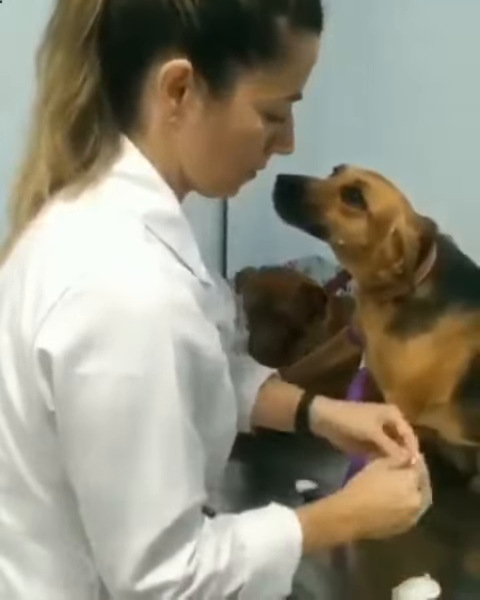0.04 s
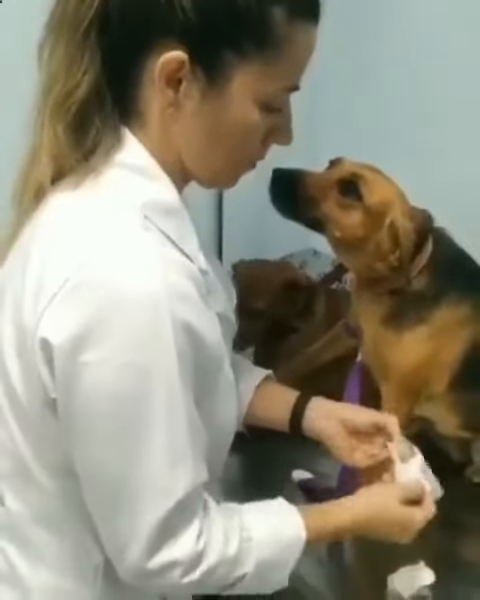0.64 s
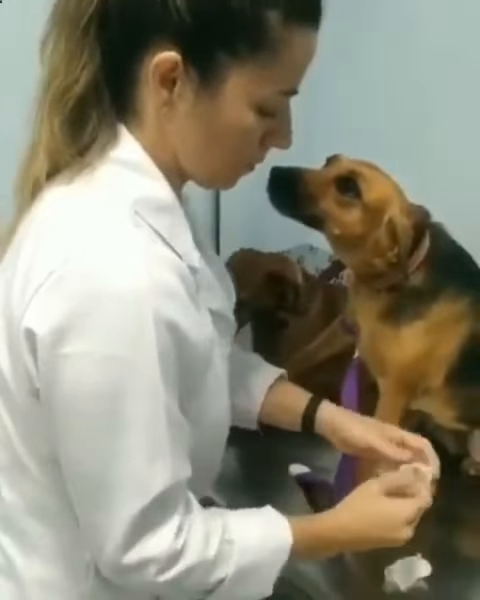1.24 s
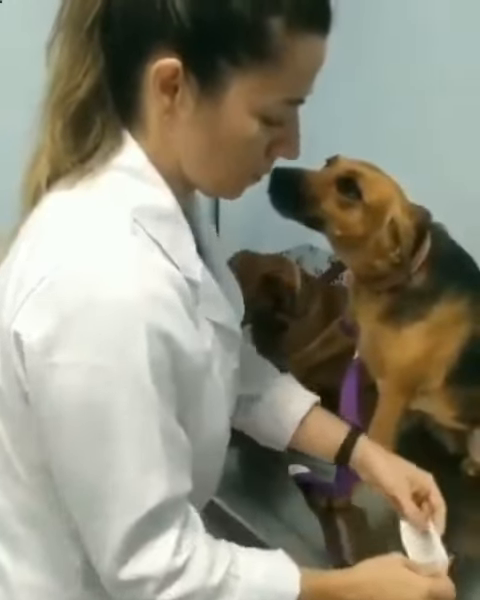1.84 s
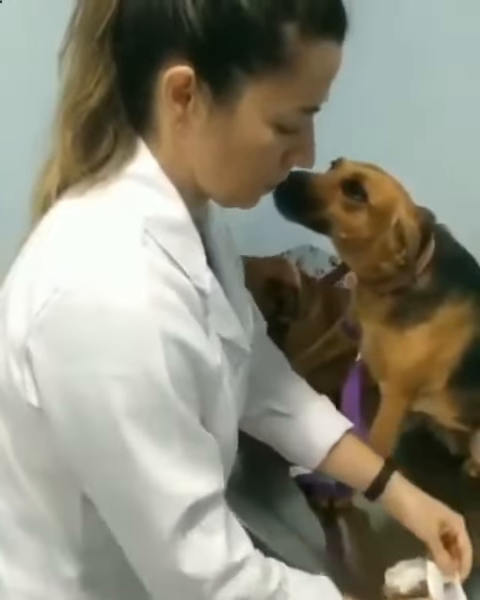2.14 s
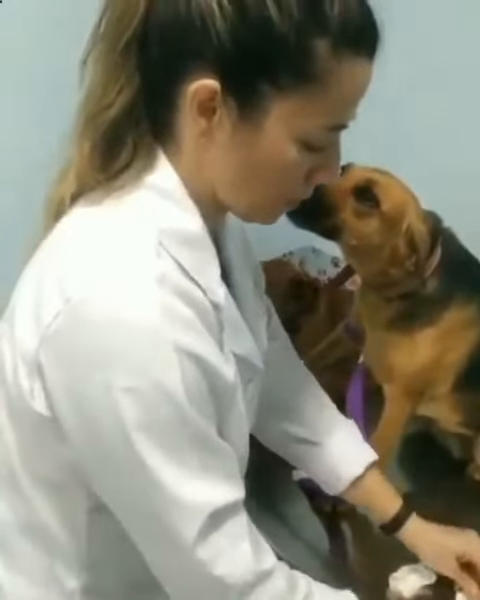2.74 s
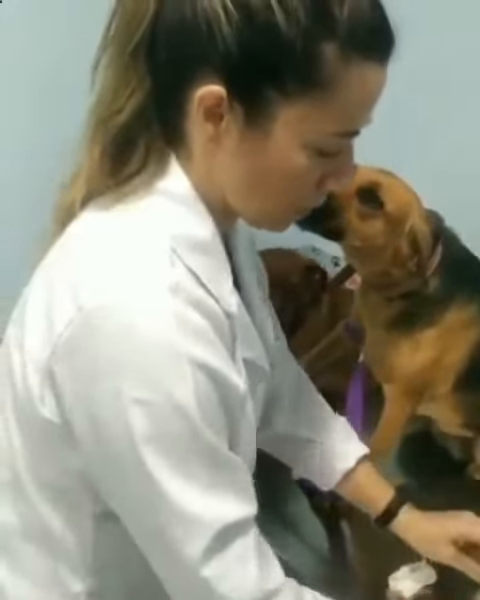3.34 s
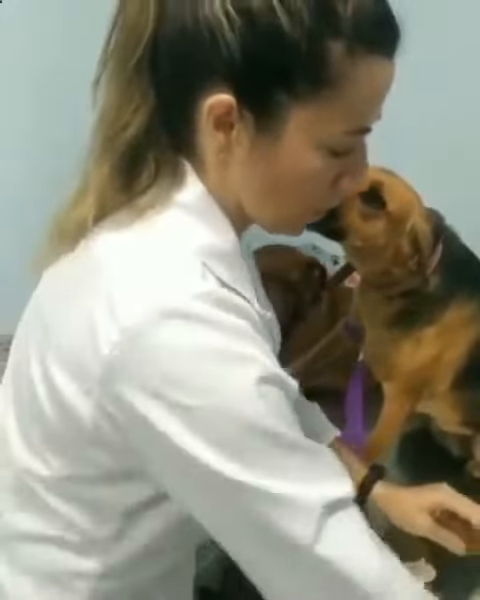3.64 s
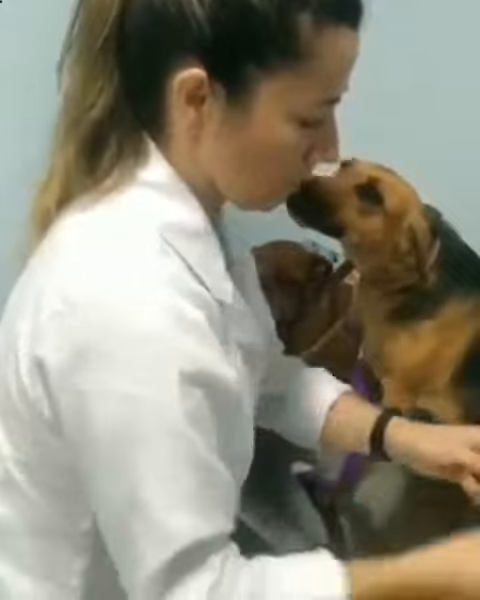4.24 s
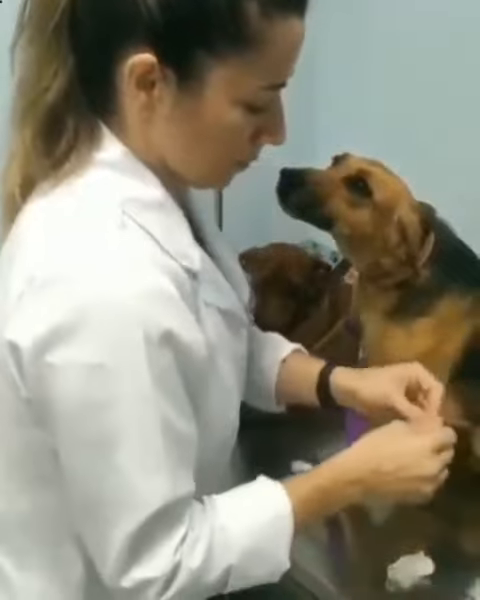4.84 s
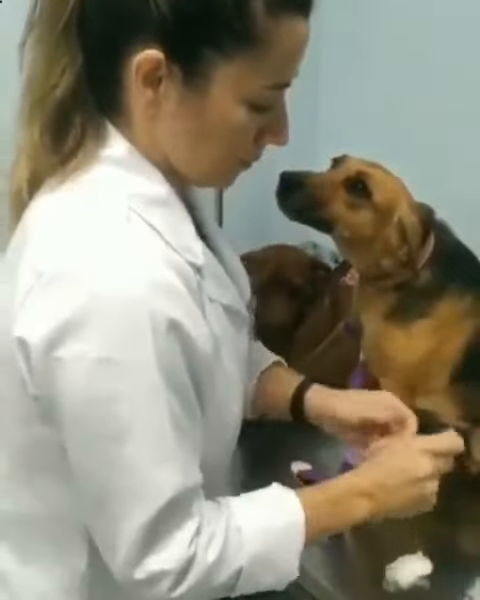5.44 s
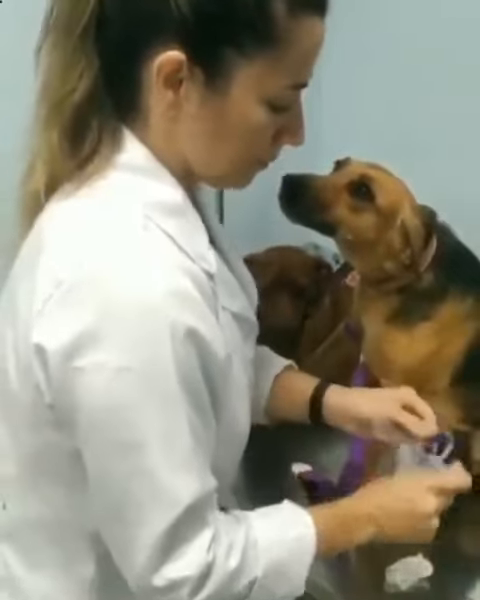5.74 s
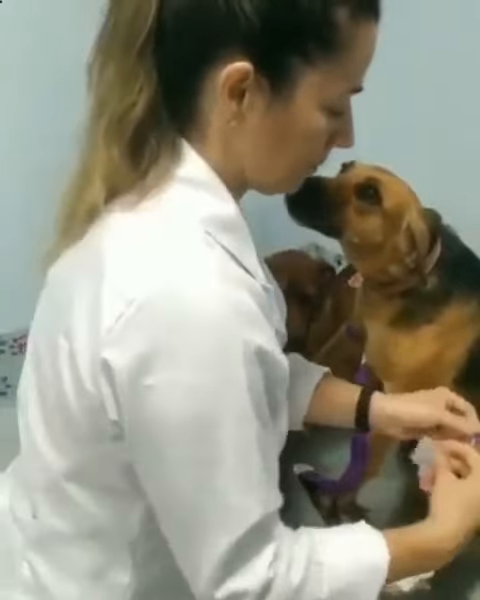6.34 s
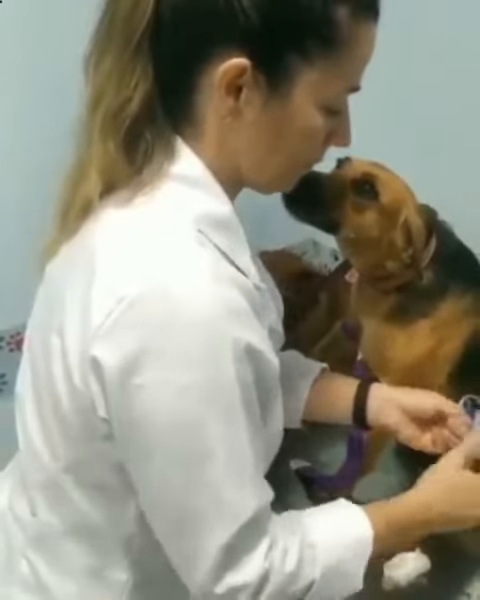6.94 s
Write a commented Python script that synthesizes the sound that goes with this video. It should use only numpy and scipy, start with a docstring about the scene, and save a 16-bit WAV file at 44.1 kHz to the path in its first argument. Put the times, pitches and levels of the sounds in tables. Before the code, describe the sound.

A paper packet crackles and tears in two busy spells with softer rustling between, in a small room with a low hum.

```python
"""Paper crackles softly over a faint fan hum as hands peel open a gauze wrapper in a small, hard room.
Creases buckle in dense crackles and single snaps, and the opening pouch rings hollow. A coat sleeve
brushes past, and fibres break in short rips that slide in pitch. The hands reach aside and the paper
quietens, then they tear and crinkle it again. The walls answer with a short, bright reverb."""
import sys
import numpy as np
from scipy import signal
from scipy.fft import rfft, irfft, next_fast_len
from scipy.io import wavfile
from scipy.ndimage import uniform_filter1d, map_coordinates

SR = 44100
rng = np.random.default_rng(int(sys.argv[2]) if len(sys.argv) > 2 else 0)


def transcribe(signal):
    """Save signal, clipped to [-1, 1], as a 16-bit WAV file at the path in sys.argv[1]."""
    frames = np.atleast_2d(signal).T
    limited = np.clip(frames, -1, 1)
    pcm = np.round(limited * 32767).astype(np.int16)
    wavfile.write(sys.argv[1], SR, pcm)


N = 313110

# Fan and duct tones. Each row: pitch in Hz, level in dB.
FAN_TONES = [(14.3, -48), (43.2, -69.5), (59.2, -58), (105.5, -65), (119.5, -63), (134.2, -65.5),
             (226.3, -71), (254, -72.5)]
# The fader ride on those tones. Each row: time in seconds, gain in dB.
FAN_RIDE = [(0, -0.5), (4.3, 0.5), (5.2, -3.5), (7.1, -4)]
# The colour of moving air. Each row: frequency in Hz, gain in dB.
AIR_EQ = [(10, -5), (30, 6.5), (48, 3.5), (80, -4), (125, 2), (160, -0.5), (320, -1), (550, -7), (900, -11),
          (1600, -16.5), (3200, -27), (6000, -31), (11000, -33)]
# Light fingering that keeps the paper crackling. Each row: time in seconds, crisp level in dB.
FINGERING = [(0, -63.5), (.4, -56.5), (.6, -48.5), (1.25, -49), (1.55, -59.5), (2.25, -58.5), (2.4, -51.5),
             (2.75, -45), (2.9, -56), (3.17, -52.5), (3.5, -59), (3.62, -70.5), (4.95, -70.5), (5.3, -42.5),
             (5.95, -48), (6.27, -68), (6.5, -53.5), (7.1, -61)]
# Pulls and squeezes; tight creases are brighter than broad peeling. Each row: start in seconds,
# length in seconds, crisp level in dB, then sheet body and top treble, both in dB relative to it.
PULLS = [(-0.016, 0.014, -41, -25, -5), (0.463, 0.21, -38.5, -5.5, -1.5), (0.591, 0.047, -29, -25, -8),
         (0.70, 0.084, -31.5, -8.5, -0.5), (0.788, 0.047, -30.5, -9, -3), (0.941, 0.075, -45, -6.5, 5.5),
         (1.087, 0.21, -47.5, -12, -7), (1.348, 0.069, -45, -5, 1), (1.579, 0.13, -48, -8.5, 0.5),
         (1.727, 0.066, -47.5, -5.5, 3), (1.818, 0.063, -39, -19, -3), (1.928, 0.089, -39, -8, -7.5),
         (2.101, 0.04, -42.5, -7.5, -3.5), (2.325, 0.056, -59, 0, 11), (2.54, 0.034, -48, 2.5, -5),
         (2.967, 0.062, -45, -3.5, 5.5), (3.03, 0.068, -41.5, -5, 0), (3.208, 0.03, -46, -7.5, 0),
         (3.947, 0.074, -52.5, -1, -4), (4.014, 0.044, -44.5, -7.5, -3.5), (4.093, 0.095, -58.5, -3, 3),
         (4.193, 0.048, -46, -8.5, -9), (4.34, 0.047, -51.5, -7.5, -9), (4.754, 0.038, -50, -3, -6),
         (4.968, 0.088, -60, 3, 1), (5.112, 0.078, -50.5, -2.5, -13), (5.24, 0.11, -38.5, -4.5, 7.5),
         (5.434, 0.039, -31, -5, 2), (5.473, 0.031, -33.5, -11, 5), (5.57, 0.028, -42.5, -16, 5.5),
         (5.989, 0.028, -42, -3.5, 0), (6.047, 0.041, -38, -11, -10), (6.319, 0.044, -45, -5.5, -6),
         (6.574, 0.054, -38, -14, -3.5), (6.861, 0.051, -47, -16, -4), (6.945, 0.076, -49, -3, 0)]
# The crisp colour of tiny creases. Each row: frequency in Hz, gain in dB.
CRISP_EQ = [(1500, -42), (3300, -19), (4500, -5.5), (5500, -1.5), (6500, 0), (7500, 2.5), (9200, 4),
            (11100, 2.5), (11800, -12)]
# The body of the bending sheet. Each row: frequency in Hz, gain in dB.
SHEET_EQ = [(120, -13), (300, -15), (650, -7), (1000, -3.5), (1400, 1.5), (2100, 1.5), (2700, 3),
            (3300, 0.5), (4000, 5.5), (5200, 0), (8000, -22.5)]
# The hollow resonances of the pouch. Each row: centre in Hz, width in Hz, gain in dB.
POUCH_MODES = [(336, 32, 3.5), (413, 33, -2.5), (1380, 250, -2.5)]
# How strongly the pouch joins the sheet. Each row: time in seconds, gain in dB.
POUCH_OPEN = [(0, 3), (.4, -2.5), (.55, -6), (.8, -18), (1.02, -1.5), (1.3, -5.5), (1.9, -20), (5.2, -22.5),
              (7.1, -11)]
# Creases that give way at once. Each row: start in seconds, crisp level in dB, flap level relative
# to it in dB, flap centre in Hz, decay time of the run of buckles in seconds.
SNAPS = [(0.117, -48, -10, 2440, 0.0044), (0.124, -43.5, -3, 3100, 0.03), (0.266, -54.5, 4, 3560, 0.0025),
         (0.279, -57, 7.5, 1370, 0.0053), (0.359, -42, -1, 3850, 0.01), (0.398, -55.5, 12, 1530, 0.0054),
         (0.443, -35.5, 1.5, 3540, 0.0091), (0.457, -35, 2.5, 4700, 0.0059),
         (0.605, -28.5, -2.5, 4840, 0.024), (0.623, -28.5, -4, 5060, 0.006), (0.713, -32, -3, 4950, 0.015),
         (0.759, -36, -10, 4000, 0.002), (0.791, -35, 1, 5500, 0.0025), (0.998, -40, -1, 1310, 0.0021),
         (1.106, -42, -6, 4220, 0.0027), (1.244, -48, -14, 4560, 0.0013), (1.265, -44.5, 2, 1290, 0.0044),
         (1.363, -51, -10, 5000, .012), (1.586, -48, -7, 4500, 0.003), (1.599, -44.5, 0, 2620, 0.0095),
         (1.813, -36, -5, 6340, 0.002), (1.856, -37, -12, 6000, 0.006), (1.929, -32, -3, 2940, 0.0032),
         (1.935, -42, -14, 3200, 0.0013), (1.991, -39, 1, 3980, 0.0012), (2.082, -41, -14, 5040, .0006),
         (2.117, -42, -2.5, 4050, 0.0011), (2.280, -46, -8, 3970, .0005), (2.326, -48, -14, 6030, 0.003),
         (2.341, -44, 5.5, 2360, 0.002), (2.475, -46, -14, 6500, .0007), (2.49, -48, -19, 4000, .001),
         (2.562, -37, -10, 3220, .003), (2.69, -37, -9, 3480, 0.019), (2.763, -35.5, -20, 4080, 0.005),
         (2.961, -40, -5.5, 2880, .005), (3.01, -39, -26, 4030, 0.0006), (3.049, -41, -4, 4500, .004),
         (3.085, -36, -17, 4500, 0.003), (3.154, -39.5, -25, 4500, 0.0034), (3.178, -40, -24, 4000, 0.0005),
         (3.968, -49, 1.5, 2660, 0.014), (4.199, -46, 2.5, 2050, 0.053), (4.36, -52, 2, 2440, 0.002),
         (4.757, -49.5, -1, 2840, 0.0018), (4.765, -57.5, 5, 3530, .001), (4.993, -58.5, 3, 2980, 0.002),
         (5.025, -42.5, -4, 4670, 0.0008), (5.15, -38, -3, 1950, 0.002), (5.226, -26, -4, 8850, 0.0003),
         (5.231, -28.5, -1, 8500, 0.001), (5.241, -34, -13, 7450, 0.0098), (5.286, -28.5, -9, 3000, 0.003),
         (5.294, -33, -0.5, 3400, 0.00053), (5.432, -29.5, -2, 4230, 0.004),
         (5.438, -28, -1.5, 4500, 0.0015), (5.456, -24, -10, 4800, 0.007), (5.478, -27, -2, 4500, 0.0013),
         (5.505, -30, 0, 8100, 0.005), (5.575, -34.5, -2, 2330, .015), (5.672, -26, -10, 3200, 0.018),
         (5.886, -56, 3, 4000, 0.0025), (5.964, -34.5, -3.5, 4700, 0.0022), (5.970, -38.5, 0, 4700, .0012),
         (6.039, -44, 2, 5000, 0.0027), (6.312, -47, 4.5, 4700, 0.00045), (6.355, -44, -3, 4020, 0.0025),
         (6.426, -39.5, 3, 3300, 0.0015), (6.439, -55, 8, 3500, .002), (6.551, -29.5, -4.5, 3270, 0.028),
         (6.555, -35, -7.5, 3960, 0.0011), (6.843, -58, -11, 5000, 0.00093), (6.924, -45, -4, 6500, 0.001),
         (6.958, -46.5, 3.5, 4530, 0.0013), (7.037, -36.5, -10.5, 3400, 0.018),
         (7.094, -33.5, -5.5, 4070, 0.011)]
# The colour of the flap a crease sets free. Each row: multiple of the flap's centre, gain in dB.
FLAP_EQ = [(.16, -24.5), (.45, -1), (.8, 4.5), (1.2, 8.5), (1.7, -2.5), (3.2, -7)]
# Soft brushes of cloth and fingers.
# Each row: peak time in seconds, half length in seconds, level in dB, centre in Hz.
BRUSHES = [(0.484, 0.053, -61, 352), (.75, 0.26, -61, 620), (1.002, 0.0069, -47, 460),
           (1.204, 0.92, -63.5, 780), (2.672, 0.15, -62, 895), (3.032, 0.23, -59.5, 706),
           (4.02, 0.065, -62, 850), (4.22, 0.051, -53.5, 785), (5.332, 0.037, -50, 425),
           (6.08, 0.085, -60, 447), (6.54, 0.16, -57, 440)]
# Rips whose pitch slides as the freed flap changes length.
# Each row: start in seconds, length in seconds, level in dB, first pitch in Hz, last pitch in Hz.
TEARS = [(0.456, 0.022, -31, 4800, 7300), (0.744, 0.096, -37, 8360, 4550), (1.814, 0.09, -48, 6800, 7500),
         (5.235, 0.06, -37.5, 8450, 3130), (5.452, 0.031, -38.5, 4600, 5240),
         (5.484, 0.042, -38, 10100, 8800), (6.053, 0.034, -37.5, 8750, 7400),
         (6.928, 0.063, -48.5, 6570, 2230)]
# The room's reverb time. Each row: frequency in Hz, seconds to fall by 60 dB.
ROOM_DECAY = [(300, 0.63), (2000, 0.68), (6000, 0.52), (11000, 0.34)]

TOP_HZ = 11850  # high cut


def amp(db):
    """Decibels to gain."""
    return 10 ** (np.asarray(db) / 20)


def unit(x):
    """Scale to rms 1."""
    return x / np.sqrt(np.mean(x ** 2) + 1e-20)


def along(points, hz):
    """Read (Hz, value) points on a log frequency axis."""
    knots_hz, values = np.transpose(points)
    return np.interp(np.log(hz + 1), np.log(knots_hz + 1), values)


def ride(points):
    """A fader ride through (seconds, value) points, one value per sample."""
    return np.interp(np.arange(N) / SR, *np.transpose(points))


def wobble(rate):
    """A smooth random curve with rate knots a second."""
    return map_coordinates(rng.standard_normal(int(N * rate / SR) + 4), [np.arange(N) * rate / SR])


def filtered(x, response):
    """Shape x with a response given as a function of Hz."""
    size = next_fast_len(N + SR // 2)
    return irfft(rfft(x, size) * response(np.fft.rfftfreq(size, 1 / SR)), size)[:N]


def resonant(x, modes):
    """Ring x through parallel resonances of (centre Hz, width Hz, dB)."""
    return filtered(x, lambda hz: sum(amp(db) * 1j * hz * width / (centre**2 - hz**2 + 1j * hz * width)
                                      for centre, width, db in modes))


def fan(air_db=-56):
    """A ventilation fan hums in slightly unsteady tones over the rush of air."""
    t = np.arange(N) / SR
    tones = np.zeros(N)
    for hz, db in FAN_TONES:
        phase = 2 * np.pi * (hz * t + rng.random()) + 0.31 * wobble(2.94)
        tones += amp(db) * np.sqrt(2) * np.sin(phase)
    air = unit(filtered(rng.standard_normal(N), lambda hz: amp(along(AIR_EQ, hz))))
    return tones * amp(ride(FAN_RIDE)) + amp(air_db) * air


def handling(attack_s=0.0081, release_db_per_s=263):
    """Pulls grip, hold and settle over the fingering: crisp level, relative body and treble, in dB."""
    t = np.arange(N) / SR
    power = np.outer(amp([0, -3, -1.5]), amp(ride(FINGERING))) ** 2  # crisp, body, treble
    for start, length_s, db, body_db, treble_db in PULLS:
        span = (t >= start) & (t < start + length_s + .5)
        age = t[span] - start
        release_db = release_db_per_s * np.maximum(age - length_s, 0)
        envelope = np.minimum(age / attack_s, 1) * amp(db - release_db)
        power[:, span] += np.outer(amp([0, body_db, treble_db]), envelope) ** 2
    crisp, body, treble = 10 * np.log10(power)
    return crisp, body - crisp, treble - crisp


def buckles(rate, spread_db):
    """Paper buckles in tiny random kicks of unequal size, levelled to an even running power."""
    kicks = (rng.random(N) < rate / SR) * rng.choice([-1, 1], N)
    kicks = kicks * amp(spread_db * rng.standard_normal(N))
    power = np.abs(uniform_filter1d(kicks ** 2, size=SR // 45))
    return kicks / np.sqrt(power + 1e-9)


def patch_click(eq, ripple_db, scatter_s=0.000701, size=512):
    """One patch of paper clicks: its faces cancel at chance frequencies and answer slightly apart."""
    hz = np.fft.rfftfreq(size, 1 / SR)
    dips, lags = np.abs(unit(uniform_filter1d(rng.standard_normal((2, len(hz))), size=7, axis=1)))
    high_cut_db = 120 * np.clip(hz / TOP_HZ - 1.02, 0, .3)
    gain = amp(along(eq, hz) - ripple_db * dips ** 2 - high_cut_db)
    cepstrum = irfft(np.log(gain))  # made minimum phase for a sharp attack
    cepstrum[1:size // 2] *= 2
    cepstrum[size // 2 + 1:] = 0
    phase_lag = 2 * np.pi * hz[1] * np.cumsum(scatter_s * lags)
    click = irfft(np.exp(rfft(cepstrum) - 1j * phase_lag))
    return click / np.linalg.norm(click)


def crinkle(crisp_db, body_db, patches=9, hiss_gain=0.06):
    """The crackle wanders between patches of the wrapper; each buckle ticks and shakes the sheet."""
    shares = amp(6.4 * np.array([wobble(28) for _ in range(patches)]))
    shares /= np.linalg.norm(shares, axis=0)
    crisp, body = np.zeros(N), np.zeros(N)
    rate = 210 * amp(.3 * np.clip(crisp_db + 45.5, -6, 22))  # harder pulling breaks more fibres
    for share in shares:
        # fibres sliding over each other add a fine hiss between the buckles
        kicks = share * unit(buckles(rate, spread_db=2) + hiss_gain * rng.standard_normal(N))
        kicks *= amp(crisp_db)
        crisp += signal.oaconvolve(kicks, patch_click(CRISP_EQ, ripple_db=6))[:N]
        body += signal.oaconvolve(kicks * amp(body_db), patch_click(SHEET_EQ, ripple_db=4))[:N]
    hollow = unit(resonant(buckles(rate=900, spread_db=9), POUCH_MODES))
    hollow *= amp(crisp_db + body_db + ride(POUCH_OPEN) - 2.5)
    catching = amp(2.33 * wobble(110))  # the paper catches and lets go, so the crackle clumps
    return catching * (crisp + body + hollow)


def snaps(patches=3, click_s=0.0008, level_span_s=0.0096, knock_db=37.5, low_cut_db_per_octave=30.5):
    """A crease lets go with one click and a run of smaller buckles, and knocks the hollow pouch."""
    out, knocks = np.zeros(N + SR), np.zeros(N)
    t = np.arange(SR // 12) / SR
    for start, db, flap_db, flap_hz, run_s in SNAPS:
        onset = round(start * SR)
        click_share = click_s / (click_s + run_s)  # a longer run leaves the first click less energy
        runs = (rng.random((patches, len(t))) < 900 / SR) * rng.standard_normal((patches, len(t)))
        runs *= np.exp(-t / run_s)
        runs *= np.sqrt(1 - click_share) / np.linalg.norm(runs)
        runs[0, 0] = np.sqrt(click_share)
        flap_eq = [(ratio * flap_hz, level) for ratio, level in FLAP_EQ]  # small stiff flaps ring higher
        crisp_eq = [(hz, level - low_cut_db_per_octave * max(np.log2(0.74 * flap_hz / hz), 0))
                    for hz, level in CRISP_EQ]
        for run in runs:  # the run spreads over neighbouring patches
            tick = patch_click(crisp_eq, ripple_db=5)
            flap = amp(flap_db) * patch_click(flap_eq, ripple_db=1.5)
            snap = np.convolve(run, tick + flap)
            out[onset:][:len(snap)] += amp(db) * np.sqrt(level_span_s * SR) * snap
        knocks[onset] = amp(db + flap_db + knock_db)
    return out[:N] + resonant(knocks * amp(ride(POUCH_OPEN)), POUCH_MODES)


def sleeve():
    """Cloth brushes past in dull swells of noise."""
    out, t = np.zeros(N), np.arange(N) / SR
    for peak_s, half_s, db, hz in BRUSHES:
        band = [(hz, 1.4 * hz, 0)]
        cloth = unit(resonant(resonant(rng.standard_normal(N), band), band))
        swell = np.exp(-((t - peak_s) / half_s) ** 2)
        out += amp(db) * swell * cloth
    return out


def tears(fibres_per_s=1700, max_fibres=400, ring_cycles=3, pitch_scatter=0.15, spread_db=6.5):
    """Fibres break along a rip, some much harder than others; each rings the flap as its pitch slides."""
    out, t = np.zeros(N + SR), np.arange(SR // 200) / SR
    for start, length_s, db, first_hz, last_hz in TEARS:
        breaks_s = np.cumsum(rng.exponential(size=max_fibres)) / fibres_per_s
        detune, force = rng.standard_normal((2, max_fibres, 1))
        progress = np.minimum(breaks_s / length_s, 1)[:, None]
        hz = first_hz * (last_hz / first_hz) ** progress * np.exp(pitch_scatter * detune)
        strength = (progress < 1) * amp(spread_db * force)
        rings = strength * np.sin(2 * np.pi * hz * t) * np.exp(-hz * t / ring_cycles)
        positions = (breaks_s * SR).astype(int)[:, None] + np.arange(len(t))
        rip = np.bincount(positions.ravel(), rings.ravel())
        rip /= np.linalg.norm(rip) + 1e-12
        out[round(start * SR):][:len(rip)] += amp(db) * np.sqrt(length_s * SR) * rip
    return out[:N]


def room_tail(predelay_s=0.0009, early_db=7, early_s=0.01):
    """Strong first reflections off table and body, then a diffuse tail whose treble dies first."""
    hz, t, noise = signal.stft(rng.standard_normal(SR // 2), SR, nperseg=256)
    decay = amp(-60 * t / along(ROOM_DECAY, hz)[:, None])
    tail = signal.istft(noise * decay, SR, nperseg=256)[1]
    t = np.arange(len(tail)) / SR
    tail *= np.clip(t / predelay_s - 1, 0, 1)
    tail *= amp(early_db * np.exp(-(t / early_s) ** 2))
    return tail / np.linalg.norm(tail)


def room(x, stretches=56):
    """The hands keep moving, so each stretch meets a different pattern of reflections."""
    out = np.zeros(N + SR)
    for stretch in np.array_split(np.arange(N), stretches):
        echo = signal.fftconvolve(x[stretch], room_tail())
        out[stretch[0]:][:len(echo)] += echo
    return out[:N]


def drifting_colour(x, depth_db=12, boost_limit=0.85):
    """Random, shifting dips and lifts colour the rustle and reverb, mostly in the treble."""
    hz, _, spectrum = signal.stft(x, SR, nperseg=512)
    shading = rng.standard_normal(spectrum.shape)
    for bins, frames in [(5, 10), (3, 3)]:  # smooth across frequency and time
        shading = uniform_filter1d(uniform_filter1d(shading, bins, axis=0), frames, axis=1)
    reach = along([(400, 0.092), (1800, 0.22), (3500, 0.43), (6500, 0.44), (10000, 0.32)], hz)
    gain = amp(depth_db * reach[:, None] * np.minimum(unit(shading), boost_limit))
    gain /= np.sqrt(np.mean(gain ** 2, axis=1, keepdims=True))
    return signal.istft(spectrum * gain, nperseg=512)[1][:N]


def scene(rustle_db=-4.5, snap_db=-4, room_db=-2.5, snap_send_db=-0.27):
    """Paper and cloth, direct and off the walls, over the fan; direct snaps skip the drifting colour."""
    crisp_db, body_db, treble_db = handling()
    paper = crinkle(crisp_db, body_db)
    cracks = snaps()
    treble = filtered(paper, lambda hz: along([(6000, 0), (9000, 0.7)], hz))
    paper += (amp(treble_db) - 1) * treble  # a high shelf that follows the hands
    rustle = paper + tears() + sleeve()
    # snaps face the listener and send a little less to the walls
    walls = amp(room_db) * room(rustle + amp(snap_send_db) * cracks)
    return (drifting_colour(amp(rustle_db) * rustle + walls) + amp(snap_db) * cracks + fan())[None]


def record(dry):
    """A steep high cut takes off everything above TOP_HZ."""
    return filtered(dry[0], lambda hz: 1 / np.sqrt(1 + (hz / TOP_HZ) ** 160))[None]


dry = scene()
out = record(dry)
transcribe(out)
```